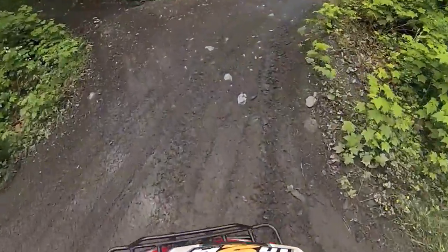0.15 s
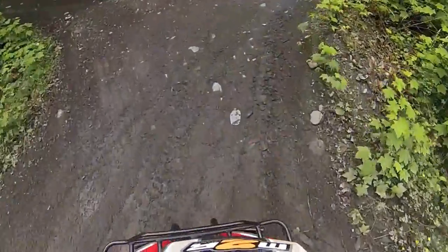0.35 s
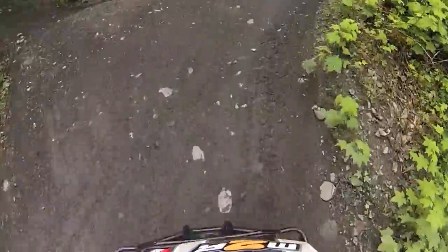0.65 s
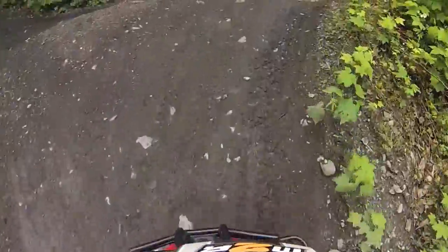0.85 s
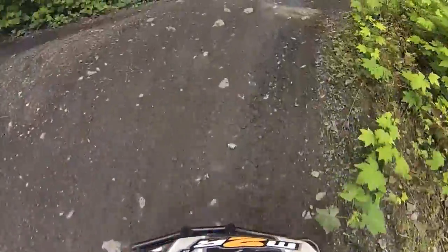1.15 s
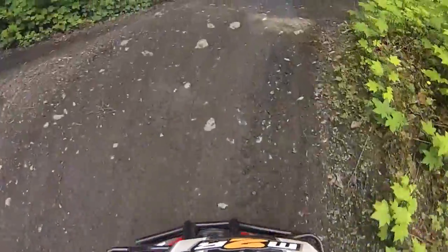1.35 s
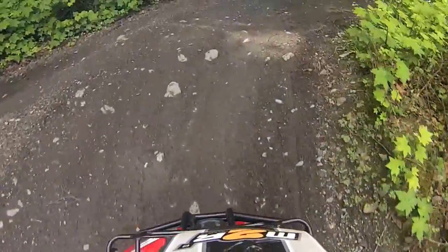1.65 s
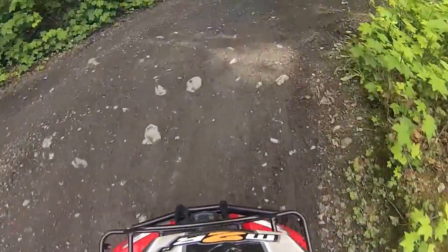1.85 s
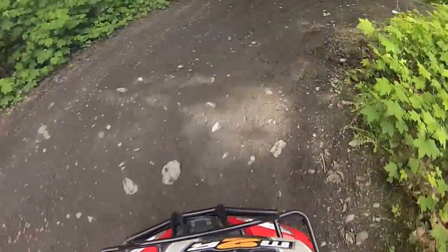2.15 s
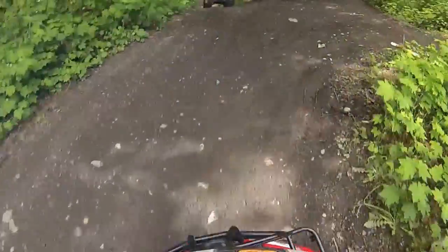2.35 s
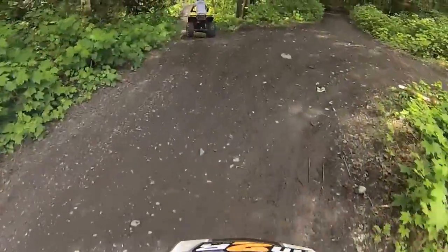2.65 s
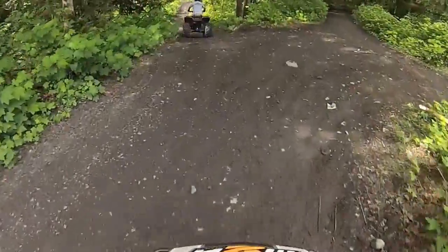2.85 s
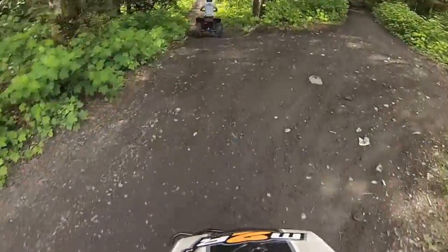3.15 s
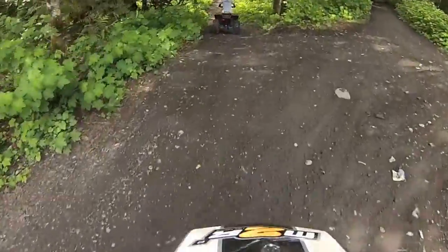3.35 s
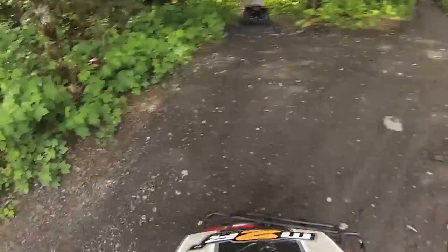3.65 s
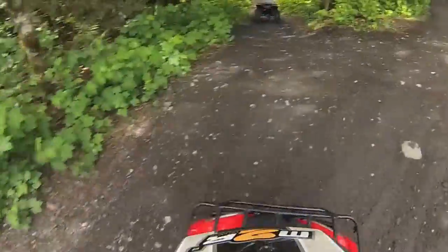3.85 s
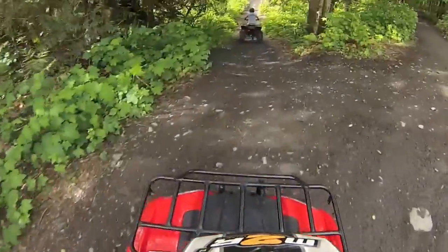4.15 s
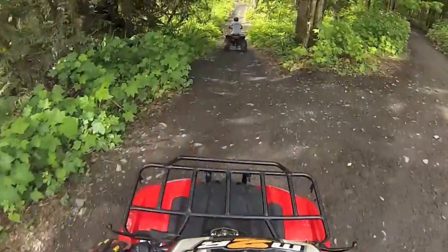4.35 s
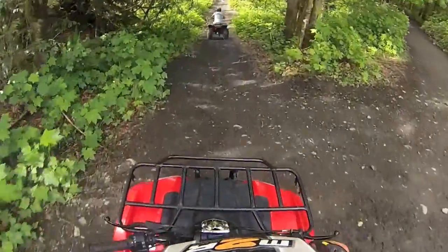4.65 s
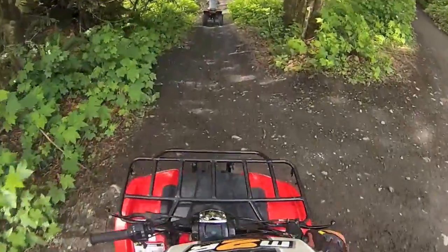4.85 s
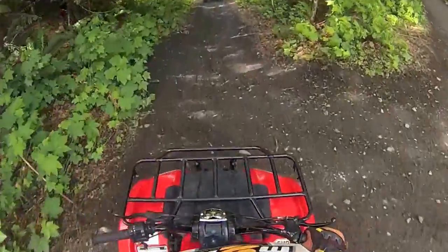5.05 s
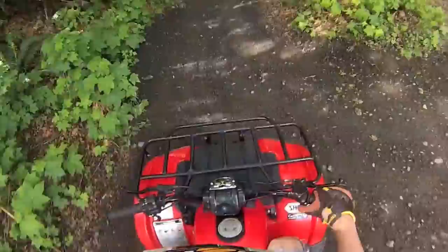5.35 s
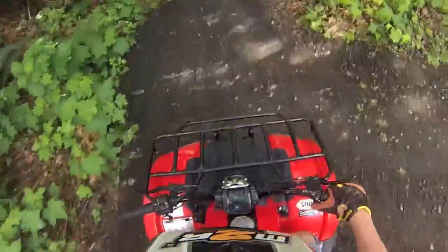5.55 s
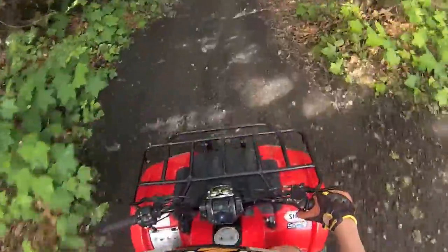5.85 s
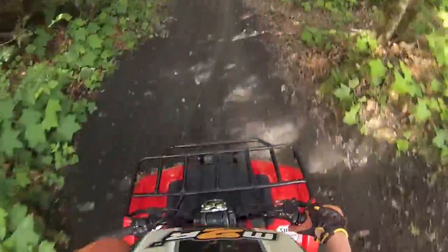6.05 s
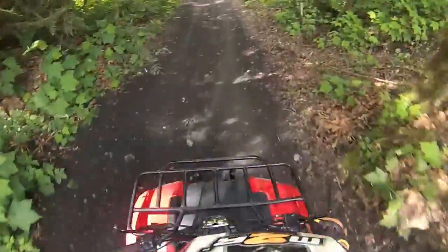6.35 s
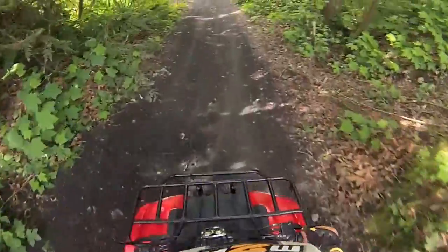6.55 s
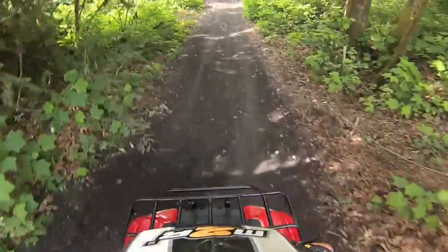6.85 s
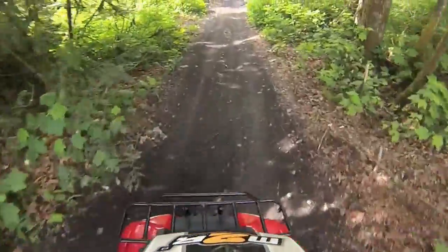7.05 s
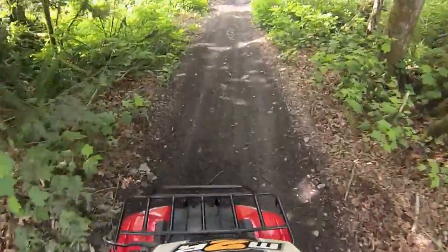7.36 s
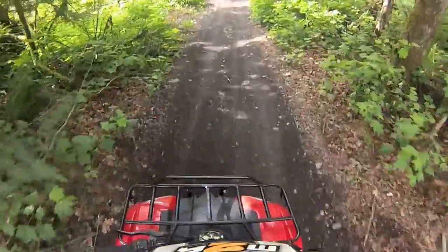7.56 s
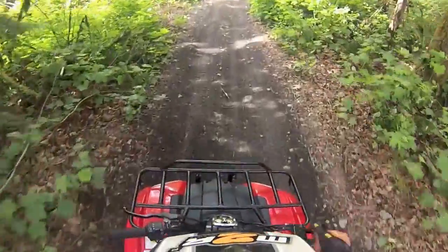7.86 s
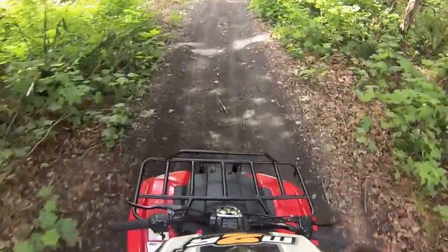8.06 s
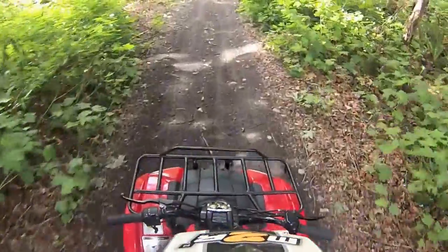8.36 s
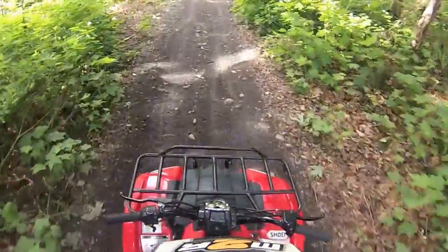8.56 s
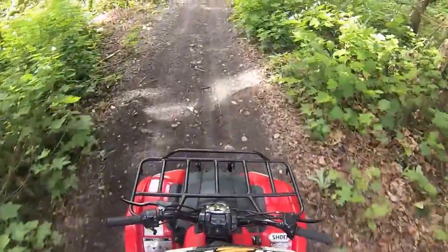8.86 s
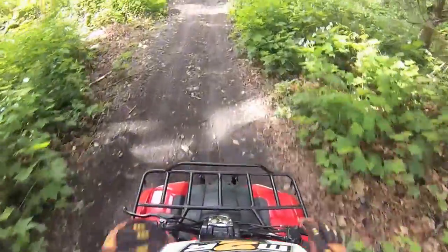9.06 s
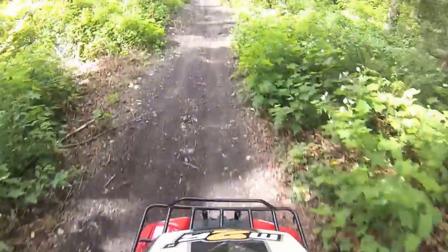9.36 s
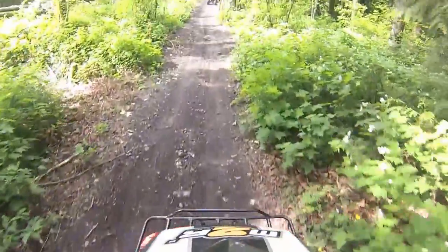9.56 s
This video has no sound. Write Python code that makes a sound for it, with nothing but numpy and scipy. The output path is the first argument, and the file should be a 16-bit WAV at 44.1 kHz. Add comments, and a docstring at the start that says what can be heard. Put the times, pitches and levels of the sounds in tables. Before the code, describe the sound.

Close, muffled onboard sound of a quad bike outdoors. The low piped exhaust pulses quickly over grainy mechanical clatter, tyre noise and breathy treble chuffs, with low gusts of wind. The throttle drops briefly, returns, then sinks into nothing. Coasting follows: faint gear whine, steady low hum and hiss, broken by bassy jolts, a strong rattling shake, one dry snap and a late run of soft thumps.

```python
"""A single-cylinder engine pulls hard, then its exhaust note sinks and fades, leaving clatter and hum.
A quad bike on a forest track, heard by a small sealed camera on the rider's helmet.
Firing pulses ring a pipe; grainy noise rings the camera case as clatter; drive tones whine thinly.
Bumps knock the mount and set it swinging, with hard snaps on the case. Around them lie shaped noises:
a bed of tyres and air, gusts of wind, treble chuffs and passing swells of hiss."""
import sys
import numpy as np
from scipy import signal
from scipy.fft import rfft, irfft
from scipy.io import wavfile

SR = 44100
rng = np.random.default_rng(int(sys.argv[2]) if len(sys.argv) > 2 else 0)


def pcm_store(signal):
    """Save signal as 16-bit PCM."""
    levels = np.round(np.clip(np.atleast_2d(signal), -1, 1) * 32767)
    wavfile.write(sys.argv[1], SR, levels.astype(np.int16).T)


N = 428652   # length in samples

# Tyres and air, the colour of the bed. Each row: frequency in Hz, relative density in dB per Hz.
BED_SPECTRUM = [(24, -56), (40, -10.5), (108, -10.5), (187, -20.5), (375, -26), (791, -30.5), (2090, -21.5),
                (2880, -37.5), (6390, -46.5), (15200, -63.5)]
# Steady noise over time. Each row: time in seconds, then levels in dB of the lower clatter,
# the upper clatter, the treble hiss and the tyre bed.
NOISE_LEVELS = [(0.0, -50, -52.5, -58, -44.5), (1.0, -52, -50, -62, -44), (2.46, -48.5, -52, -62.5, -44.5),
                (3.63, -45.5, -47.5, -56.5, -43), (5.71, -55, -47, -59.5, -49.5),
                (6.14, -46.5, -45, -56, -46), (7.12, -47, -48.5, -60, -47.5), (7.85, -51.5, -51, -62, -49),
                (8.6, -51.5, -49, -60, -47), (9.72, -54, -56, -65.5, -50)]
# Wind gusts. Each row: peak time in seconds, peak level in dB.
WIND_GUSTS = [(.68, -24), (1.3, -26.5), (2.05, -24), (4.26, -26), (5.75, -20.5), (6.081, -21.5),
              (9.02, -24)]
# Passing swells of hiss and faint singing bands. Each row: start in seconds, length in seconds,
# centre in Hz, filter width per pass in Hz, level in dB.
SINGING_BANDS = [(0.163, 0.42, 6500, 1500, -58), (0.197, 0.31, 10500, 4800, -62),
                 (3.299, 0.92, 3500, 300, -60.5), (4.05, 0.66, 1884, 110, -46.5),
                 (5.972, 0.087, 3400, 3700, -51.5)]
# Treble resonances. Each row: frequency in Hz, width in Hz, relative level in dB.
TREBLE_MODES = [(2990, 98, 1.5), (3610, 284, 3.5), (5200, 1280, 0.5), (5546, 550, 2.5), (6330, 600, -5),
                (7960, 430, -3), (8810, 480, -10.5), (10700, 1030, -9), (13150, 3600, -17.5)]
# Treble chuffs, alone or in even runs. Each row: first start in seconds, how many,
# gap in seconds, relative strength in dB.
CHUFF_RUNS = [(0.034, 3, 0.11, -48), (0.375, 2, 0.059, -42), (.644, 1, 0, -46.5), (1.081, 1, 0, -50),
              (1.671, 3, 0.075, -46), (2.041, 1, 0, -43), (2.373, 2, .155, -51), (2.636, 5, 0.098, -51),
              (3.29, 6, 0.064, -50), (3.745, 2, 0.098, -47), (3.93, 7, 0.058, -50.5),
              (4.407, 9, 0.074, -50.5), (5.016, 3, 0.063, -46.5), (5.235, 11, .0628, -46.5),
              (5.968, 5, 0.075, -46.5), (6.69, 3, 0.058, -48.5), (6.868, 1, 0.033, -47),
              (7.184, 2, 0.213, -47.5), (8.635, 3, 0.069, -57)]
# Camera case resonances, lower pair then upper pair. Each row: frequency in Hz,
# width per pass in Hz, relative level per pass in dB.
CASE_MODES = [(1384, 306, 4.5), (980, 280, -8.5), (1905, 710, -1), (2474, 930, -7.5)]
# Narrow rings of the case when struck. Each row: frequency in Hz, width in Hz, relative level in dB.
CASE_RINGS = [(600, 74, -6), (780, 50, 0)]
# The toneless snap above those rings. Each row: frequency in Hz, width in Hz, relative level in dB.
BROAD_SNAP = [(3300, 3000, -15)]
# Hard contacts and scrapes on the case. Each row: start in seconds, relative strength in dB,
# time to fall 60 dB in seconds.
HARD_CONTACTS = [(5.74, -40, 0.12), (5.999, -38.5, 0.17), (6.472, -19, 0.018), (8.525, -41.5, 0.064),
                 (8.949, -48, 0.11)]
# Knocks on the mount. Each row: time in seconds (the thump starts 3 ms later), then relative
# strengths in dB of the dull part and the sharp part.
MOUNT_KNOCKS = [(4.665, -10.5, -30), (4.957, -28.5, -37.5), (5.136, -34.5, -48), (5.703, -30, -41),
                (5.741, -20.5, -42), (5.752, -15.5, -35), (5.903, -37.5, -39.5), (5.976, -24, -50),
                (6, -16, -41), (6.019, -14.5, -40), (6.039, -18.5, -51), (6.473, -10.5, -23),
                (6.806, -35, -42), (7.292, -32, -38.5), (7.431, -31.5, -38), (7.634, -36, -39.5),
                (8.129, -25.5, -50), (8.365, -32.5, -47), (8.411, -39, -44), (8.525, -25.5, -49),
                (8.624, -23.5, -57.5), (8.715, -30.5, -44), (8.918, -24, -53.5), (8.958, -30, -47),
                (9.035, -28, -43)]
# Ringing modes of the mount. Each row: frequency in Hz, relative level in dB,
# time to fall 60 dB in seconds.
MOUNT_MODES = [(78.6, -3, 0.063), (137, 5.5, 0.066), (295, 15, 0.018), (380, -4, 0.12)]
# Even hum of the mount near idle. Each row: start in seconds, end in seconds, pitch in Hz, level in dB.
IDLE_HUMS = [(4.62, 4.663, 99.5, -34), (6.83, 8.115, 101.8, -35), (9.15, 9.702, 96.9, -41.5)]
# Bumps that set the mount swinging. Each row: peak time in seconds, rise in seconds,
# fall in seconds, pitch in Hz, peak level in dB.
MOUNT_SWINGS = [(4.73, .15, .11, 100, -23.5), (5, .08, 0.16, 93.8, -39.5), (5.2, 0.1, 0.11, 94.4, -39.5),
                (5.53, 0.15, 0.16, 95.9, -35), (5.771, 0.095, 0.052, 95.46, -22.5),
                (6.09, 0.074, .17, 88, -17), (6.24, 0.067, .07, 88.5, -28.5),
                (6.31, 0.066, 0.27, 90.9, -31), (6.555, 0.12, .06, 97.5, -22),
                (6.63, 0.056, 0.21, 91.4, -35), (8.163, 0.069, 0.062, 90.5, -23),
                (8.22, 0.034, 0.073, 86, -26.5), (8.48, 0.17, 0.21, 98, -28),
                (8.651, 0.054, .08, 97, -29.5), (8.74, 0.1, 0.081, 100.2, -32), (8.84, .1, .12, 91.4, -36),
                (9.02, 0.13, 0.11, 96.1, -27.5), (9.11, 0.098, .1, 97.6, -35)]
# Shudder resonances. Each row: frequency in Hz, width in Hz, relative level in dB.
SHUDDER_MODES = [(151, 18.3, 3), (240, 100, -11.5), (347, 86, -10), (51.6, 58, 5.5), (94, 51, 1)]
# Drive whine. Each row: time in seconds, pitch in Hz, level in dB.
WHINE_CURVE = [(3.1, 382, -63), (3.45, 416.2, -58.5), (5.55, 389.8, -54.5), (6.6, 405, -66),
               (6.85, 396.6, -56.5), (7.25, 360.2, -63), (7.52, 410, -55.5), (7.87, 357.7, -58.5),
               (8.25, 398, -60), (9.2, 392, -64)]
# Gear mesh. Each row: time in seconds, base pitch in Hz, base level in dB.
GEAR_CURVE = [(4.95, 319, -72), (5.95, 311.5, -65.5), (6.45, 325.6, -85), (7.3, 310.4, -71),
              (8.9, 321, -66)]
# Gear mesh partials. Each row: multiple of the base pitch, level above the base level in dB.
GEAR_MULTIPLES = [(2, -3.5), (3, -1.5), (4, 2.5)]
# Engine under throttle. Each row: time in seconds, firing rate in Hz, exhaust level in dB
# (the piped pulses sit 8 dB below it).
THROTTLE = [(0.0, 28.5, -61.5), (0.29, 31.66, -45), (0.41, 31.02, -50.5), (0.53, 33.05, -47.5),
            (0.65, 30.6, -49.5), (.82, 31.73, -48.5), (1.42, 30, -50), (2.1, 31, -45), (2.5, 31.04, -47.5),
            (2.79, 33.07, -44), (2.99, 34.23, -45), (3.13, 28.95, -66), (3.3, 30.7, -60),
            (3.58, 32.9, -53.5), (3.69, 30.56, -55), (3.86, 31.8, -51.5), (4.2, 29, -58),
            (4.46, 26.76, -62), (4.62, 26.7, -73)]
# Clean engine orders riding on the exhaust level. Each row: multiple of the firing rate,
# level in dB at middle throttle.
ENGINE_ORDERS = [(2, -48), (3, -50), (6, -59.5), (8, -52.5), (9, -50.5), (10, -53), (11, -62), (12, -61.5),
                 (13, -61.5)]
# Pipe resonances. Each row: frequency in Hz, width per pass in Hz, relative level per pass in dB.
PIPE_MODES = [(251, 104, 1), (426, 41, 3.5), (197, 154, 1)]

BREEZE_DB, GUST_RISE_DB_PER_S, GUST_FALL_DB_PER_S = -37.5, 118, 135
CHUFF_JITTER_S, CHUFF_SPREAD_DB = .003, 1
SWING_RANGE_DB, SWING_ROUNDING = 23.5, 1.56   # lost over rise and fall; 1 = pointed top, 2 = round
SHUDDER_DB, SHUDDER_SHARE, SHUDDER_FLOOR_DB = -25, 0.52, -51.5   # follows a share of the swing in dB
FOURTH_ORDER_DB, MIDDLE_THROTTLE_DB = -41, -45.5
CEILING, KNEE = 0.85, 19   # overload level and sharpness of its onset
CUTOFF_HZ = 15420


def from_db(db):
    """Gain of a level in dB."""
    return 10 ** (np.asarray(db) / 20)


def rms_one(x):
    """Scale to unit power."""
    return x / np.sqrt(np.mean(x ** 2) + 1e-20)


def white_noise():
    """Fresh white noise of spread 1."""
    return rng.standard_normal(N)


def filtered(x, order, hz, kind):
    """Butterworth filter."""
    return signal.sosfilt(signal.butter(order, hz, kind, fs=SR, output="sos"), x)


def in_time(rows):
    """Columns joined by straight lines, and a gate that fades over 30 ms outside the table."""
    s, *columns = np.transpose(rows)
    t = np.arange(N) / SR
    gate = np.interp(t, [s[0] - .03, s[0], s[-1], s[-1] + .03], [0, 1, 1, 0])
    return [np.interp(t, s, column) for column in columns] + [gate]


def drift(rate):
    """Slow chance of spread 1: noise through two equal poles with their corner at the rate in Hz."""
    step = 40   # computed on every 40th sample
    r = np.exp(-2 * np.pi * rate * step / SR)
    chance = rng.standard_normal(N // step + 2002)
    slow = signal.lfilter([1], [1, -2 * r, r * r], chance)[2000:]   # skip the settling
    return np.interp(np.arange(N) / step, np.arange(len(slow)), rms_one(slow))


def lost(start, end, rise, fall):
    """How far a swell has sunk before its start and after its end, at the given rates per second."""
    t = np.arange(N) / SR
    return np.maximum(start - t, 0) * rise + np.maximum(t - end, 0) * fall


def resonate(x, modes, patchy_db=0, rate=8.0):
    """Parallel resonances of alternating sign, each with a level wavering by patchy_db."""
    out = 0
    for k, (hz, width, level_db) in enumerate(modes):
        r = np.exp(-np.pi * width / SR)
        poles = [2, -4 * r * np.cos(2 * np.pi * hz / SR), 2 * r * r]
        band = signal.lfilter([1 - r * r, 0, r * r - 1], poles, x + 1e-18)
        out = out + (-1) ** k * from_db(level_db + patchy_db * drift(rate)) * band
    return out


def resonate_twice(x, modes, **wavering):
    """Two passes of the same resonances for steeper sides; only the second wavers."""
    return resonate(resonate(x, modes), modes, **wavering)


def tone(hz):
    """A sine of unit power that follows a pitch curve, starting anywhere in its cycle."""
    return np.sqrt(2) * np.sin(2 * np.pi * (np.cumsum(hz) / SR + rng.random()))


def impulses(rows, column):
    """One click per row, of the level in that column."""
    out, rows = np.zeros(N), np.array(rows)
    out[(rows[:, 0] * SR).astype(int)] = from_db(rows[:, column])
    return out


def fading(x, t60):
    """Each click becomes a step that dies away, 60 dB in t60 seconds."""
    return signal.lfilter([1], [1, -from_db(-60 / (t60 * SR))], x + 1e-18)


def tyre_bed():
    """Tyres and air: noise shaped along a spectrum drawn over log frequency."""
    bed_db = in_time(NOISE_LEVELS)[3]
    spectrum_hz, density_db = np.transpose(BED_SPECTRUM)
    log_hz = np.log(np.fft.rfftfreq(N, 1 / SR) + 1)
    colour = from_db(np.interp(log_hz, np.log(spectrum_hz), density_db))
    return from_db(bed_db) * rms_one(irfft(rfft(white_noise()) * colour, N))


def wind():
    """Wind buffeting the case: very low noise over an even breeze, with gusts that build and collapse."""
    gusts_db = [db - lost(s, s, GUST_RISE_DB_PER_S, GUST_FALL_DB_PER_S) for s, db in WIND_GUSTS]
    wind_db = np.maximum(np.max(gusts_db, axis=0), BREEZE_DB)
    buffeting = filtered(white_noise(), 2, [8, 23], "band")
    return from_db(wind_db) * rms_one(buffeting * from_db(0.58 * drift(4.2)))


def singing():
    """Resonant bands of noise that swell and fade."""
    t, white, out = np.arange(N) / SR, white_noise(), 0
    for start, length, hz, width, db in SINGING_BANDS:
        swell = np.sin(np.pi * np.clip((t - start) / length, 0, 1)) ** .5
        out = out + from_db(db) * swell * rms_one(resonate_twice(white, [(hz, width, 0)]))
    return out


def chuffs():
    """Short treble puffs: high noise through the treble resonances, slightly uneven in time and strength."""
    rows = np.array([(s + k * gap, db) for s, count, gap, db in CHUFF_RUNS for k in range(count)])
    rows = rows + rng.standard_normal(rows.shape) * [CHUFF_JITTER_S, CHUFF_SPREAD_DB]
    shape = np.interp(np.arange(2000), [0, 200, 1000, 2000], [0, .8, .6, 0])   # quick start, soft end
    envelope = np.convolve(impulses(rows, column=1), shape)[:N]
    puff = filtered(white_noise(), 2, 6500, "high")
    coloured = resonate(puff, TREBLE_MODES, patchy_db=2.0, rate=3.0)   # the colour wavers between chuffs
    return from_db(-9.5) * envelope * rms_one(coloured + 0.03 * puff)


def strands(low_hz, high_hz, count):
    """Narrow rings of loose parts, each swelling and fading on its own."""
    pitches = np.geomspace(low_hz, high_hz, count) * (1 + 0.022 * rng.standard_normal(count))
    return resonate(white_noise(), [(hz, 23, 1) for hz in pitches], patchy_db=2.5, rate=5)


def clatter_and_hiss():
    """Valve gear makes grainy noise; it rings the case in two bands and hisses in the treble."""
    lower_db, upper_db, treble_db, *_ = in_time(NOISE_LEVELS)
    ticks = white_noise() * from_db(2.0 * drift(62))
    ticks = ticks + 1.54 * strands(899.7, 8000, count=34)
    lower = rms_one(resonate_twice(ticks, CASE_MODES[:2], patchy_db=0.5, rate=23))
    upper = rms_one(resonate_twice(ticks, CASE_MODES[2:], patchy_db=1.5, rate=4))
    narrow_modes = [(hz, width / 2, 0) for hz, width, db in TREBLE_MODES]
    peaky = ticks + 0.48 * resonate(ticks, narrow_modes)
    hiss = rms_one(resonate(peaky, TREBLE_MODES, patchy_db=1.4, rate=1.17))
    return from_db(lower_db) * lower + from_db(upper_db) * upper + from_db(treble_db) * hiss


def snaps():
    """Hard contacts: bursts of noise that ring the case and die away."""
    t, envelope = np.arange(N // 40) / SR, np.zeros(N)
    for s, db, t60 in HARD_CONTACTS:
        at = int(s * SR)
        attack = np.minimum(12 * t / t60, 1)
        envelope[at:at + len(t)] += from_db(db - 60 * t / t60) * attack
    crack = filtered(envelope * white_noise(), 3, 4500, "low")
    case = resonate_twice(crack, CASE_MODES)
    return from_db(17.0) * (case + resonate(crack, CASE_RINGS) + resonate(crack, BROAD_SNAP))


def knocks():
    """A soft push rings the mount; its dull and its sharp part have their own strength."""
    dull = filtered(impulses(MOUNT_KNOCKS, column=1), 4, 260, "low")
    sharp = filtered(impulses(MOUNT_KNOCKS, column=2), 8, 440, "low")
    thump = 0
    for hz, db, t60 in MOUNT_MODES:
        r, w = from_db(-60 / (t60 * SR)), 2 * np.pi * hz / SR
        push = dull if hz < 250 else sharp
        ring = signal.lfilter([0, np.sin(w)], [1, -2 * r * np.cos(w), r * r], push + 1e-18)
        thump = thump + from_db(db) * ring
    return np.roll(thump, int(0.003 * SR))   # every thump starts 3 ms after its listed time


def shake():
    """The mount hums at the pitch of its strongest motion, and shudders as it swings."""
    swings_db = [db - SWING_RANGE_DB * lost(s, s, 1 / rise, 1 / fall) ** SWING_ROUNDING
                 for s, rise, fall, hz, db in MOUNT_SWINGS]
    idle_db = [db - lost(start, end, 195, 220) for start, end, hz, db in IDLE_HUMS]
    motions_db = swings_db + idle_db
    hum_db = np.max(motions_db, axis=0)
    strongest = np.argmax(motions_db, axis=0)
    pitches = np.array([row[3] for row in MOUNT_SWINGS] + [row[2] for row in IDLE_HUMS])
    hum_hz = pitches[strongest] * (1 + 0.01503 * drift(12.0))
    hum = from_db(hum_db + 2.7 * drift(17.0)) * tone(hum_hz)

    shudder_db = SHUDDER_DB + SHUDDER_SHARE * np.max(swings_db, axis=0)
    floor_db = SHUDDER_FLOOR_DB - lost(IDLE_HUMS[0][0], N / SR, 275, 0)   # from the first idle hum on
    jolts = (rng.random(N) < 150 / SR) * white_noise() * 17   # loose play takes up in uneven jolts
    shudder = rms_one(resonate(white_noise() + jolts, SHUDDER_MODES))
    return hum + from_db(np.maximum(shudder_db, floor_db)) * shudder


def whine(rows, partials):
    """Thin drive tones on a drawn pitch curve, wavering slightly in pitch and level."""
    hz, db, gate = in_time(rows)
    hz = hz * (1 + 0.004 * drift(27.3))
    out = 0
    for multiple, part_db in partials:
        out = out + from_db(db + part_db + 2.2 * drift(42)) * tone(multiple * hz)
    return gate * out


def engine():
    """Clean orders of the firing rate, and one uneven pulse per firing into the resonant pipe."""
    firing_hz, exhaust_db, gate = in_time(THROTTLE)
    firing_hz = firing_hz * (1 + 0.0044 * drift(4.5))   # the crank speed wavers
    fourth = from_db(FOURTH_ORDER_DB + 1.0 * drift(6.7)) * tone(4 * firing_hz)
    orders = 0
    for multiple, db in ENGINE_ORDERS:
        load = .3 if multiple < 4 else .95   # the lowest orders follow the throttle much less
        order_db = db + load * (exhaust_db - MIDDLE_THROTTLE_DB) + 2.2 * drift(3.0)
        orders = orders + from_db(order_db) * tone(multiple * firing_hz)
    cycles = np.cumsum(firing_hz) / SR + .006 * drift(15)   # slightly uneven timing
    fired = np.diff(np.floor(cycles), prepend=0) > 0
    pulses = fired * from_db(1.0 * white_noise())
    rasp = 0.012 * white_noise() * fading(pulses, 0.1)   # gas rushes out behind each pulse
    pipe = rms_one(resonate_twice(pulses + rasp, PIPE_MODES))
    return gate * (fourth + orders + from_db(exhaust_db - 8.0) * pipe)


def scene():
    """All sources meet in one microphone."""
    background = tyre_bed() + wind() + singing() + chuffs()
    contacts = snaps() + knocks() + shake()
    drive = whine(WHINE_CURVE, [(1, 0)]) + whine(GEAR_CURVE, GEAR_MULTIPLES)
    return (background + clatter_and_hiss() + contacts + drive + engine())[None]


def record(dry):
    """Peaks near the ceiling are rounded off, then a steep low-pass cuts the top."""
    rounded = dry / (1 + np.abs(dry / CEILING) ** KNEE) ** (1 / KNEE)
    return signal.sosfilt(signal.ellip(14, .5, 70, CUTOFF_HZ, fs=SR, output="sos"), rounded)


dry = scene()
out = record(dry)
pcm_store(out)
```